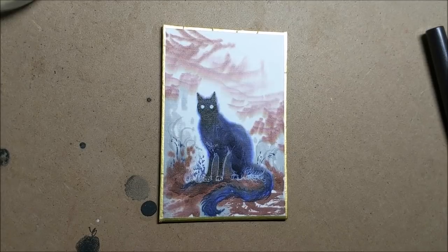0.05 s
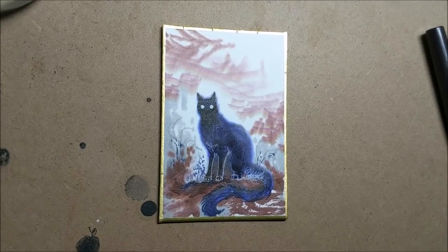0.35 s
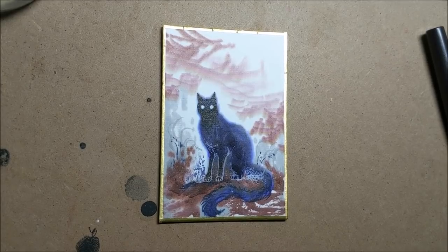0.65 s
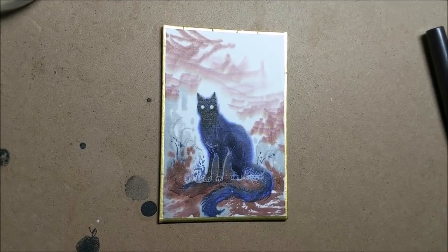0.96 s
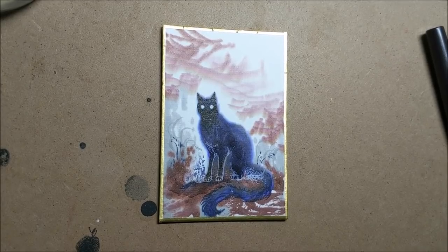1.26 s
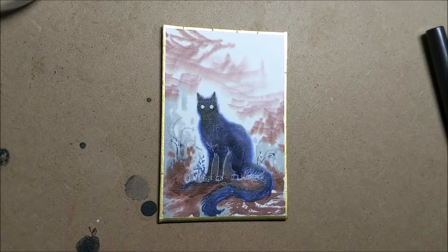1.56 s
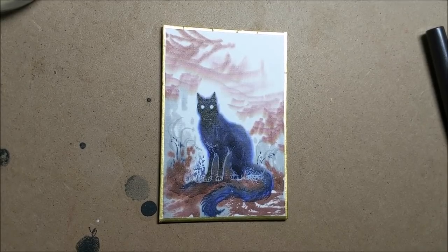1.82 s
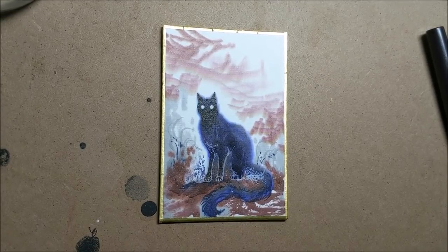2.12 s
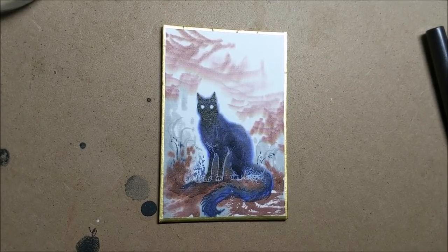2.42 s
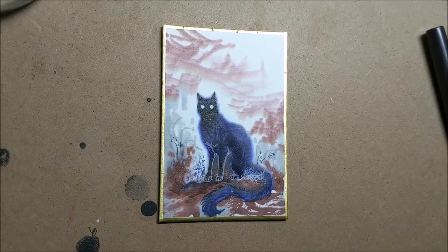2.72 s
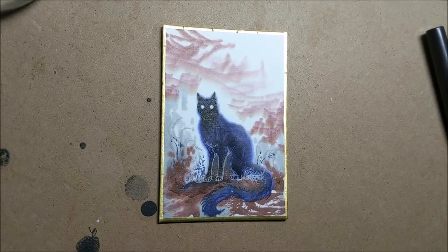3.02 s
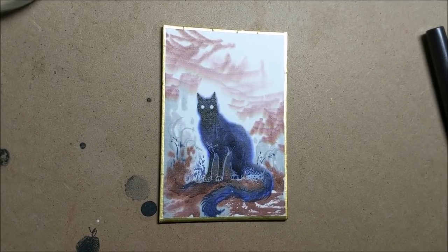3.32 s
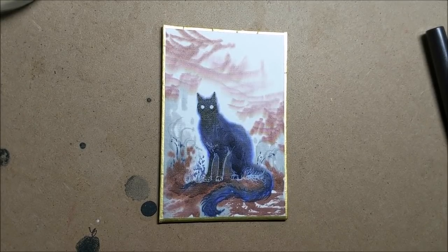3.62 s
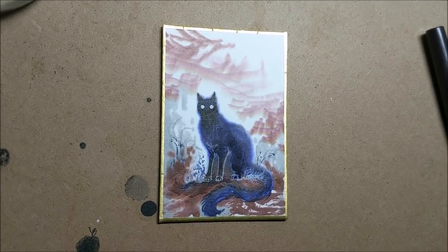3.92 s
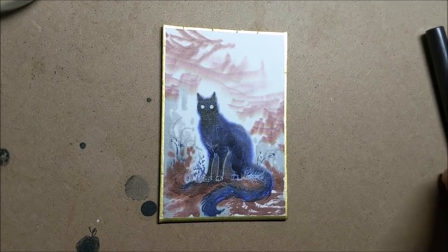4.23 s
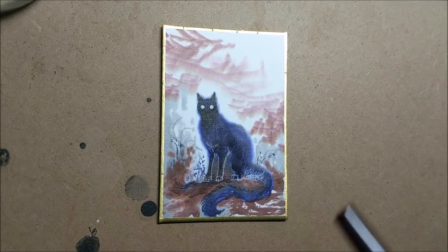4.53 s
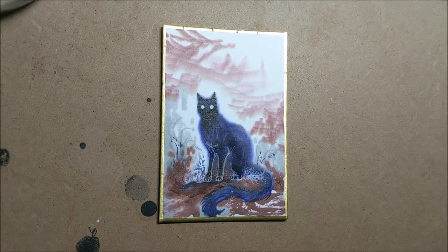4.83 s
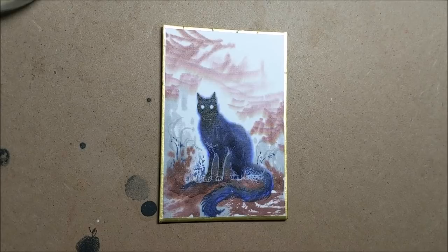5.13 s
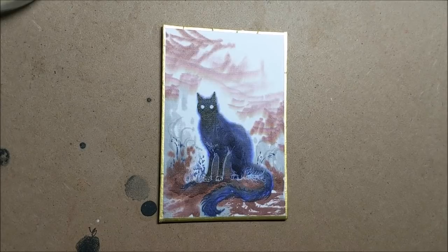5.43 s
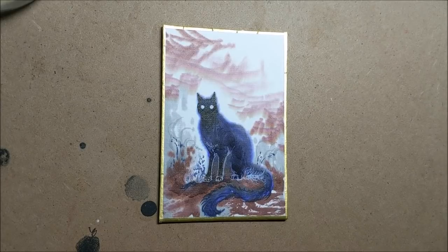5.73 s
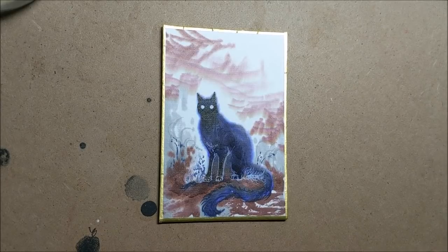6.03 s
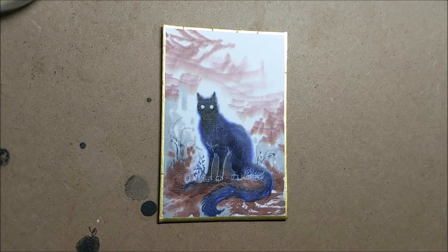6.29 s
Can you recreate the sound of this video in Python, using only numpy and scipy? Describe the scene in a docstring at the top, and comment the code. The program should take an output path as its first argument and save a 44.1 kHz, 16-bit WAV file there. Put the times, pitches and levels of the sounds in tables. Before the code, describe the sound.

Pens and art tools click and knock on a desk over quiet room hum, with one sharp clatter near the end.

```python
"""Pens and art tools on a board desk in a small bare room, heard from a camera's stereo microphone above.
Mains hum, a faint fan and hiss lie under it all. After one faint tap, tools are picked up and knocked
together from 1.4 to 3 s: each contact is a short crack that rings desk and barrels, and many rebound once.
Light taps and soft rubbing follow. At 6 s comes the hardest clatter, with a thin ring, then two last taps."""
import sys
import numpy as np
from scipy import signal
from scipy.fft import rfft, irfft, next_fast_len
from scipy.io import wavfile
from scipy.ndimage import uniform_filter1d, map_coordinates

SR = 44100
rng = np.random.default_rng(int(sys.argv[2]) if len(sys.argv) > 2 else 0)


def materialize(psi):
    """Save the field psi as 16-bit PCM at rate SR to the path in sys.argv[1].

    A 1-D psi becomes a single channel; in a 2-D psi each row is a channel.
    """
    bounded = np.clip(np.atleast_2d(psi).T, -1, 1)
    quanta = np.round(bounded * 32767).astype(np.int16)
    wavfile.write(sys.argv[1], SR, quanta)


N = 280476


def amp(db):
    """Decibels to gain."""
    return 10 ** (np.asarray(db) / 20)


def unit(x):
    """x at rms 1."""
    return x / np.sqrt(np.mean(x ** 2) + 1e-20)


def along(points, hz):
    """(Hz, value) points read on a log axis."""
    freqs, values = np.transpose(points)
    return np.interp(np.log(hz + 1), np.log(freqs + 1), values)


def filtered(x, response):
    """x shaped by a function of frequency."""
    n = x.shape[-1]
    padded = next_fast_len(n + 8192)
    return irfft(rfft(x, padded) * response(np.fft.rfftfreq(padded, 1 / SR)), padded)[..., :n]


def bandpass(hz, centre_hz, octaves):
    """A causal band-pass response around a centre."""
    half = 2 ** (max(octaves, .1) / 2)
    return signal.freqs(*signal.butter(2, [centre_hz / half, centre_hz * half], 'band', analog=True), hz)[1]


def add(track, s, x):
    """Mix x into track from time s."""
    start = max(round(s * SR), 0)
    part = track[:, start:start + x.shape[-1]]
    part += x[..., :part.shape[-1]]


def stereo(noise, likeness):
    """Two unrelated noises become left and right with the given correlation."""
    turn = np.arccos(np.clip(likeness, -1, 1)) / 2
    mid, side = np.cos(turn) * noise[0], np.sin(turn) * noise[1]
    return np.array([mid + side, mid - side])


def ringing(modes, t):
    """Decaying sines from (Hz, dB, t60 in seconds) rows, at random phases."""
    phases = rng.uniform(0, 2 * np.pi, len(modes))
    onset = 1 - np.exp(-t / .00022)
    return onset * sum(amp(db - 60 * t / t60) * np.sin(2 * np.pi * hz * t + phase)
                       for (hz, db, t60), phase in zip(modes, phases))


# The room's air at the microphone. Each row: frequency in Hz, relative noise density in dB.
AIR_SPECTRUM = [(20, 22.5), (50, 5.5), (59, 22), (70, 6), (110, -2), (230, 1.5), (450, -5), (950, -2.5),
                (1600, 0), (2100, -5.5), (3200, -5.5), (6000, -6), (11000, -10), (16000, -10)]
# Its stereo image. Each row: frequency in Hz, left-right correlation.
AIR_LIKENESS = [(60, 0.98), (150, 0.51), (380, 0), (950, 0.18), (2400, 0.054), (15000, 0)]
# Mains, fan and electronics. Each row: frequency in Hz, rms level in dB.
HUM_LINES = [(59.6, -68.5), (119, -83), (167, -81), (237, -82.5), (958, -84), (15563, -82.5)]
def room_tone(air_db, waver_rad):
    """Steady air noise, near mono in the bass, with slightly unsteady hum lines in the centre."""
    t, hz = np.arange(N) / SR, np.fft.rfftfreq(N, 1 / SR)
    noise = stereo(rfft(rng.standard_normal((2, N))), along(AIR_LIKENESS, hz))
    air = irfft(noise * amp(along(AIR_SPECTRUM, hz)), N)
    hum = np.zeros(N)
    for line_hz, db in HUM_LINES:
        drift = map_coordinates(rng.standard_normal(32), [t * 4], mode='mirror')
        hum += np.sqrt(2) * amp(db) * np.sin(2 * np.pi * line_hz * t + waver_rad * drift)
    return amp(air_db) * unit(air) + hum


# The bare room's tail. Each row: frequency in Hz, time to fall 60 dB (t60) in seconds.
ROOM_DECAY = [(100, 0.31), (300, 0.36), (1000, 0.28), (3000, 0.27), (6000, 0.28), (10000, 0.22),
              (16000, 0.26)]
# What the walls send back. Each row: frequency in Hz, relative level in dB.
WALL_COLOUR = [(100, -36), (300, -1), (1000, 7.5), (3000, 2), (6000, 3), (10000, 2.5), (16000, -3)]
# The tail's stereo image. Each row: frequency in Hz, left-right correlation.
ROOM_LIKENESS = [(100, 0.58), (250, 1), (600, 1), (1500, 0.097)]
def room(tail_db, wall_db, late_db, wall_s, build_s):
    """The room's impulse response from the desk: a near wall's echo and a short diffuse tail."""
    hz, t, noise = signal.stft(rng.standard_normal((2, SR // 2)), SR, nperseg=256)
    hz = hz[:, None]
    fall_db = -60 * t / along(ROOM_DECAY, hz)
    fading = amp(fall_db) + amp(late_db + fall_db / 2)  # a weak part lingers twice as long
    spectrum = stereo(noise, along(ROOM_LIKENESS, hz)) * fading * amp(along(WALL_COLOUR, hz))
    tail = signal.istft(spectrum, SR, nperseg=256)[1]
    t = np.arange(tail.shape[1]) / SR
    build_up = 1 - np.exp(-(t / build_s) ** 2)
    answer = amp(tail_db) * unit(tail * build_up) / np.sqrt(len(t))
    echo_s = wall_s + rng.normal(0, .0004)  # the tool moves, so the echo shifts
    add(answer, echo_s, amp(wall_db) * np.ones((2, 1)))
    return answer


# Tools and fingers sliding over the desk. Each row: start in seconds, length in seconds,
# centre in Hz, half-width in octaves, level at the crest in dB.
RUBS = [(1.722, 0.63, 559, 1.3, -72.5), (1.887, 0.65, 2925, 0.29, -70), (3.685, 0.085, 14100, 0.55, -64.5),
        (3.813, 0.23, 13520, 0.76, -65), (5.083, 0.13, 13220, 0.81, -68), (5.627, 0.076, 14000, 1.16, -66),
        (6.12, 0.32, 7000, 1.4, -69), (6.197, 0.057, 1146, 1.7, -44.5)]
def slides(grain_db):
    """Soft rubbing swells and fades, made uneven by the grain of the board."""
    out = np.zeros((2, N))
    for s, length_s, centre_hz, octaves, db in RUBS:
        size = int(length_s * SR)
        grain = amp(grain_db * unit(uniform_filter1d(rng.standard_normal(SR), 200)))
        friction = stereo(rng.standard_normal((2, SR)), likeness=.735) * grain
        rub = filtered(friction, lambda hz: np.exp(-(np.log2((hz + 1) / centre_hz) / octaves) ** 2))
        add(out, s, amp(db) * unit(rub)[:, :size] * np.sqrt(np.hanning(size)))
    return out


# Fingers shifting the tools. Each row: start in seconds, end in seconds, base strength in dB.
FINGERING = [(1.749, 2.42, -61.5), (5.123, 5.24, -56)]
def finger_ticks(per_s):
    """Faint, unevenly spaced touches, as rows like TOOL_CONTACTS without the rebound."""
    weight_db, hard_db, note_hz, room_db = -14.5, -7.5, 3000, -4
    rows = []
    for start, end, db in FINGERING:
        count = max(round((end - start) * per_s), 1)
        for k, (when, force) in enumerate(rng.uniform(0, 1, (count, 2))):
            s = start + (end - start) * (k + when) / count
            rows.append((s, db + 6 * force - 1.5, weight_db, hard_db, note_hz, room_db))
    return rows


# The desk top's slow modes. Each row: frequency in Hz, relative level in dB, t60 in seconds.
DESK_TOP_MODES = [(92, -19, 0.37), (115.8, -1.5, 0.53), (210, 9.5, 0.23), (249, 8, 0.36), (386, -9, 0.42),
                  (439.6, 8, 0.26), (863, 3, .2)]
def desk_boom(db):
    """The desk top rings on low after a thud, in the centre of the image."""
    return amp(db) * ringing(DESK_TOP_MODES, np.arange(SR // 2) / SR)


# The hardest struck tool. Each row: frequency in Hz, relative level in dB, t60 in seconds.
TOOL_MODES = [(2643, -13, 0.15), (2910, -9, 0.26), (3350, -21.5, 0.33), (3980, 0, 0.21), (4430, 3, 0.14),
              (5420, -13, 0.31), (6270, -26, 0.28), (6395, -9, 0.18), (6740, -23, 0.19), (7800, -9, 0.31),
              (9400, -18, 0.16), (11500, -4, 0.17)]
def thin_ring(db):
    """A hard blow wakes a tool's high modes, at separate phases left and right."""
    t = np.arange(12000) / SR
    return amp(db) * np.array([ringing(TOOL_MODES, t), ringing(TOOL_MODES, t)])


MEDIUM_DB = -35  # strength of a medium contact
def barrel_pings(contacts, t60_s):
    """A light tap rings a barrel's note, which lingers in the room; hard tips favour its overtone."""
    t, notes = np.arange(SR // 4) / SR, np.zeros((1, N))
    for s, db, weight_db, hard_db, hz, _, _ in contacts:
        if db < -19:  # harder blows rattle instead of ringing one note
            muting_db = max(weight_db + 6.5, 0)  # weight on the desk mutes the barrel
            level_db = -41 + .75 * (db - MEDIUM_DB) - muting_db
            note = (hz, level_db - .1 * hard_db, t60_s)
            overtone = (2.1 * hz, level_db + hard_db - 1, t60_s)  # second bending mode
            add(notes, s, ringing([note, overtone], t)[None])
    answer = room(tail_db=-7.5, wall_db=-12, late_db=-24, wall_s=.01, build_s=.017)
    return notes + signal.fftconvolve(notes, answer, axes=1)[:, :N]


# Resonances of the desk board and of the barrels. Each row: frequency in Hz, width in Hz, gain in dB.
BOARD_RESONANCES = [(103.5, 7.7, 18.5), (233, 20, 4), (377, 16, 7.5), (573, 95, -6.5), (824, 164, 9),
                    (1190, 27, -42), (1373, 47, 3), (1720, 190, 7.5)]
BARREL_RESONANCES = [(2420, 600, 8), (3120, 550, -3), (3850, 1400, -6), (5510, 410, 5.5), (9500, 130, 3),
                     (14200, 580, -6)]
# The desk as the microphone hears it. Each row: frequency in Hz, left minus right in dB.
MIC_BALANCE = [(200, -6.5), (1000, 1), (4000, -1.5), (8000, -1.5), (11500, -4.5), (14500, -1)]
def path_to_microphone(hz, left_lag_s):
    """A blow passes through the ringing desk and barrels and reaches the nearer, right port first."""
    bodies = 1 + sum(amp(db) * 1j * hz * width / (centre ** 2 - hz ** 2 + 1j * hz * width)
                     for centre, width, db in BOARD_RESONANCES + BARREL_RESONANCES)
    balance = amp(np.outer([1, -1], along(MIC_BALANCE, hz)) / 2)
    delay = np.exp(-2j * np.pi * np.outer([left_lag_s, 0], hz))
    return bodies * balance * delay


# The bands of one blow. In order: base width in octaves of thud, knock, click and tick.
BAND_OCTAVES = [1.29, 1.016, 1.366, 1.49]
def blow(db, weight_db, hard_db, note_hz):
    """A snap and a brief chatter of surfaces, heard as a low thud, a knock, a click and a high tick."""
    size = 12000
    t, hz = np.arange(size) / SR, np.fft.rfftfreq(size, 1 / SR)
    t60_s = .029 * 2 ** (min(db - MEDIUM_DB, 0) / 49)  # lighter contacts are briefer
    chatter = unit(stereo(rng.standard_normal((2, size)), likeness=.34) * amp(-60 * t / t60_s))
    impulse = unit(signal.unit_impulse(size, round(.0005 * SR)))
    snap = amp(.5) * (.02 / t60_s) ** 2 * impulse  # the briefer the contact, the harder its snap
    crack = rfft(chatter + snap) * path_to_microphone(hz, left_lag_s=.0001256)
    knock_db = db + .5 + .5 * weight_db + .089 * max(db - MEDIUM_DB, 0)
    knock_hz = 1017 * 2 ** (-weight_db / 37)  # weight on the desk deepens the knock
    thud_width, knock_width, click_width, tick_width = BAND_OCTAVES
    # high knocks and low clicks lie near a barrel's own notes and are purer
    knock_width *= min(1100 / knock_hz, 1) ** .69
    click_width *= min(note_hz / 3600, 1)
    bands = [(db + weight_db, 369, thud_width), (knock_db, knock_hz, knock_width),
             (db, note_hz, click_width), (db + hard_db, 8600, tick_width)]
    hit = sum(amp(level) * unit(irfft(crack * bandpass(hz, centre, width)))
              for level, centre, width in bands)
    return hit * np.sqrt(.005 * SR / size)  # each band has the energy of 5 ms at its level


# Tools meeting the desk and each other below the microphone. Each row: start in seconds, strength in dB,
# weight on the desk (thud over click) in dB, hardness (tick over click) in dB, barrel note in Hz,
# send to the room in dB, rebound delay in seconds (0 for none).
TOOL_CONTACTS = [(.143, -55.5, -10, -10, 3520, -3.5, 0.0031), (1.366, -34.5, -20, -11, 3740, -4, 0.0034),
                 (1.483, -43.5, -11, -12.5, 2680, -9.5, 0), (1.545, -54.5, -14.5, -17, 2670, -9, 0),
                 (1.662, -55.5, 7, -29, 3086, -1, 0.0029), (1.677, -40, -6, -15, 2194, -11, 0.0052),
                 (1.911, -49, -18, 3, 3720, -4, 0), (1.958, -54, -19, -23.5, 3520, -2, .018),
                 (2.101, -56.5, -4.5, -7, 2850, -8, 0.0034), (2.239, -53.5, -13, -8, 2906, -7, .034),
                 (2.486, -42.5, -14.5, -12.5, 2720, -3.5, 0.00073),
                 (2.504, -24.5, -41.5, -15, 3750, -6.5, .0125), (2.565, -29, -28.5, -14, 3690, -5.5, 0),
                 (2.5896, -32.5, -30, -8, 4250, -8, 0.015), (2.7544, -34.5, -3.5, 4, 5070, -3.5, 0.0022),
                 (2.775, -34.5, -31, -1.5, 4244, -6.5, 0.0017),
                 (2.8049, -43.5, -32, -6, 3100, -0.5, 0.0024), (2.8602, -35, -2, -8, 3000, -4.5, .003),
                 (2.984, -34.5, -15.5, -9, 2680, -7.5, 0), (3.706, -54.5, -9, -21, 5380, -5.5, 0),
                 (3.813, -55.5, -4.5, -14, 2822, -8.5, 0.0062), (3.829, -65, -4.5, 12, 4900, -4, 0),
                 (3.989, -54, -8.5, 0.5, 2994, -4.5, 0.015), (4.451, -47, -2.5, -7, 3490, -4.5, 0.0094),
                 (4.959, -58.5, -7, -19.5, 5410, -5, 0.001), (5.16, -63, -12, 4.5, 5740, -18, 0.03),
                 (5.171, -54.5, -6, -3, 5380, -8, 0), (5.206, -54, -2.5, -5, 3170, -12.5, 0.00056),
                 (5.975, -25.5, -23, -10, 4105, 2, 0.00043), (5.9867, -13, -17, 0, 4112, -8, 0.0018),
                 (5.996, -21.5, -16.5, 3.5, 4300, -7, 0.0042),
                 (6.0357, -19, -18.5, -11, 3843, -16, 0.00059), (6.219, -40.5, 2, -7, 2199, -2, 0.0039),
                 (6.3337, -46.5, -5.5, 10, 6000, -5, 0.021)]
def tool_knocks(rebound_loss_db):
    """Every contact, weaker rebound and finger tick sounds a blow, and the room answers it."""
    touches = [row[:-1] for row in TOOL_CONTACTS]
    touches += [(s + gap, db - rebound_loss_db, *tone) for s, db, *tone, gap in TOOL_CONTACTS if gap > 0]
    touches += finger_ticks(per_s=12)
    out = np.zeros((2, N))
    for s, db, weight_db, hard_db, note_hz, room_db in touches:
        hit = blow(db, weight_db, hard_db, note_hz)
        answer = room(tail_db=1.5, wall_db=-7, late_db=-25.5, wall_s=.0063, build_s=.0052)
        add(out, s, hit)
        add(out, s, amp(room_db) * signal.fftconvolve(hit, answer, axes=1))
        thud_db = db + weight_db
        if thud_db > -60:  # faint thuds leave the desk top still
            add(out, s, desk_boom(thud_db - 20.5))
        if db > -19:
            add(out, s, thin_ring(db - 16))
    return out


def scene():
    """Tools on the desk in front, the tone of the room behind."""
    tools = tool_knocks(rebound_loss_db=4.5) + barrel_pings(TOOL_CONTACTS, t60_s=.034)
    return tools + slides(grain_db=4.5) + room_tone(air_db=-60, waver_rad=.65)


def record(dry):
    """The camera rounds off peaks near full scale, drops the deepest rumble and cuts the highest treble."""
    ceiling, rumble_hz, top_hz = .88, 14, 15900
    rounded = dry / (1 + abs(dry / ceiling) ** 6) ** (1 / 6)
    passband = lambda hz: hz / np.hypot(hz, rumble_hz) * np.clip((top_hz + 150 - hz) / 300, 0, 1)
    return filtered(rounded, passband)


dry = scene()
out = record(dry)
materialize(out)
```